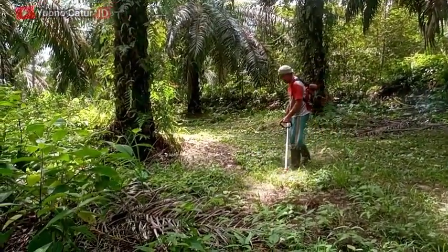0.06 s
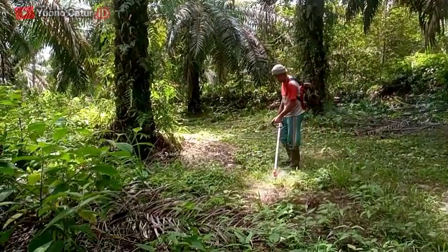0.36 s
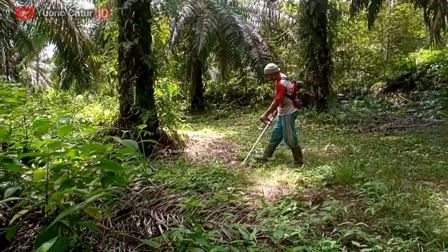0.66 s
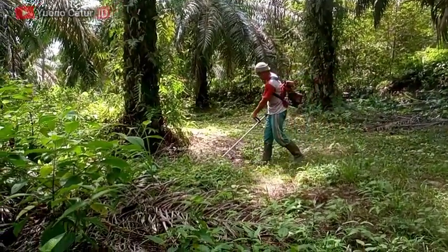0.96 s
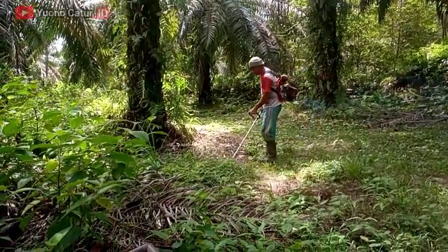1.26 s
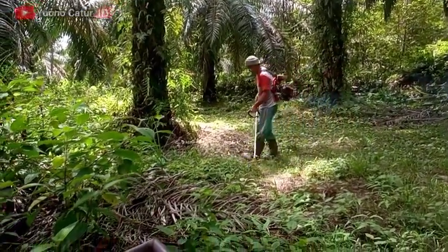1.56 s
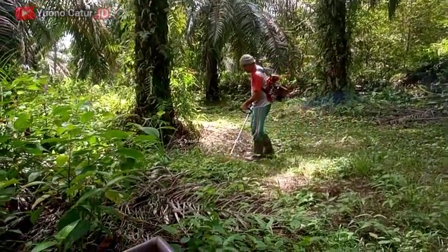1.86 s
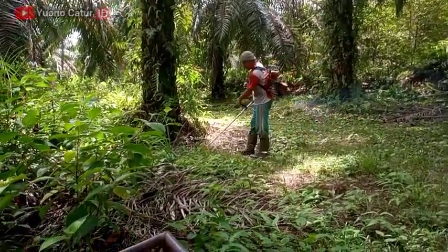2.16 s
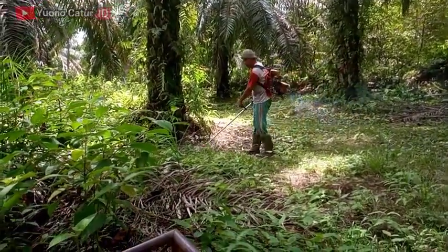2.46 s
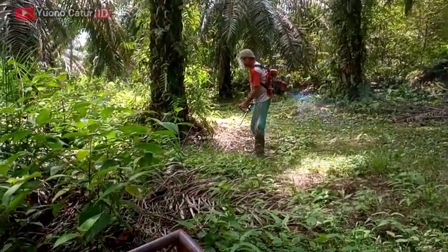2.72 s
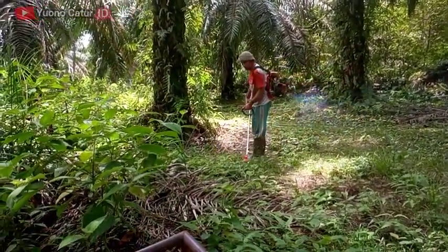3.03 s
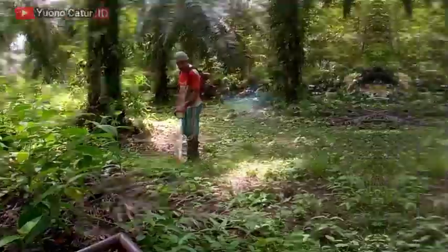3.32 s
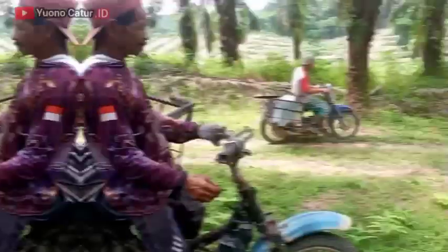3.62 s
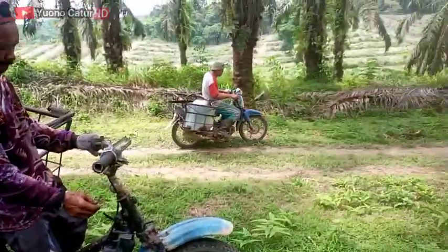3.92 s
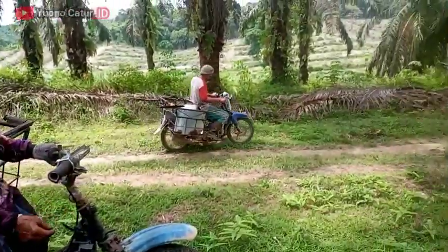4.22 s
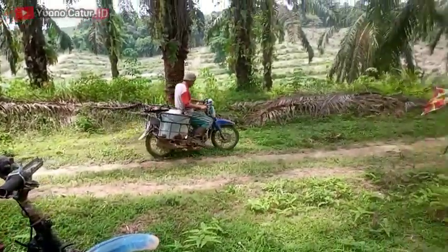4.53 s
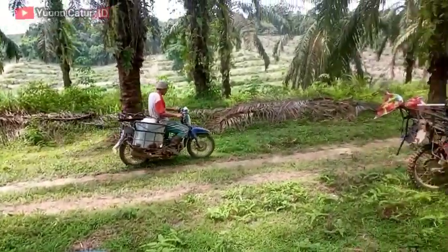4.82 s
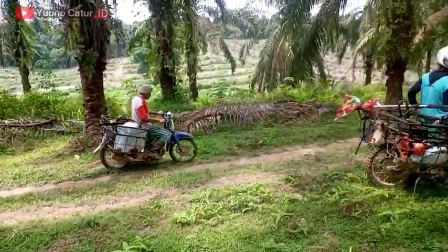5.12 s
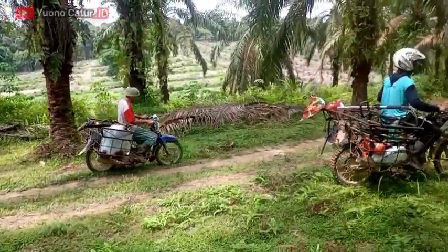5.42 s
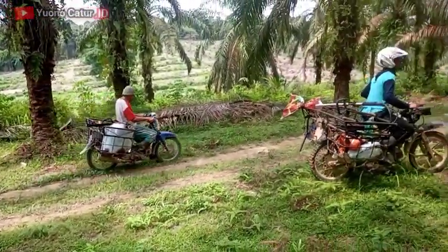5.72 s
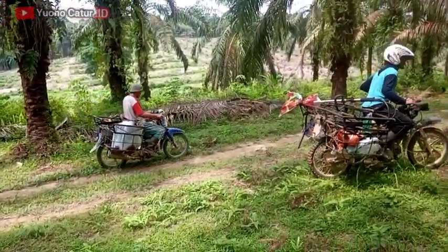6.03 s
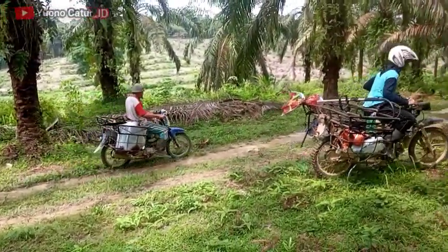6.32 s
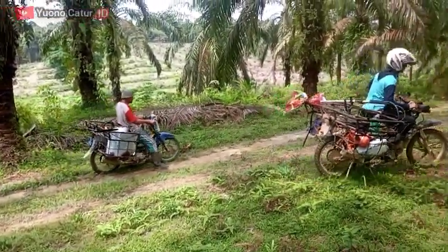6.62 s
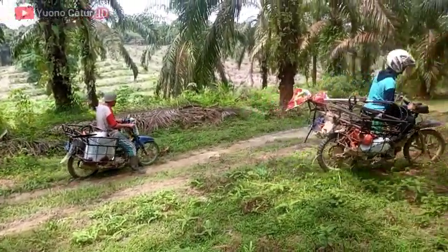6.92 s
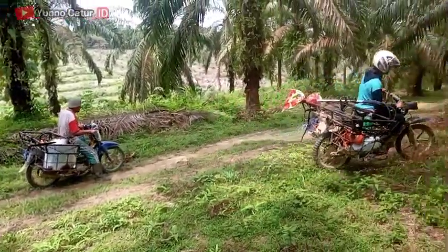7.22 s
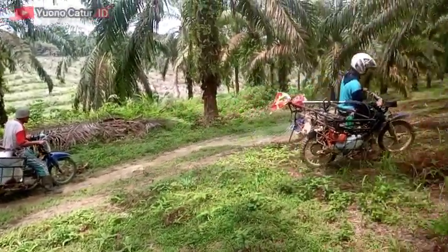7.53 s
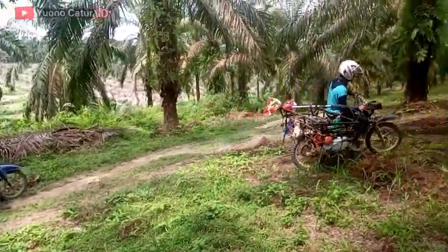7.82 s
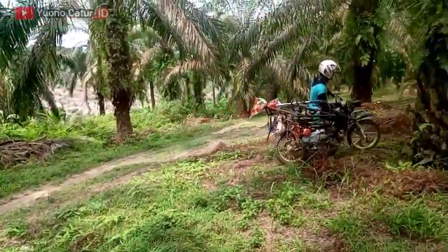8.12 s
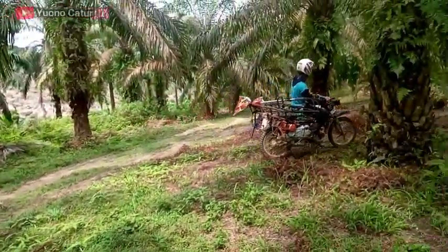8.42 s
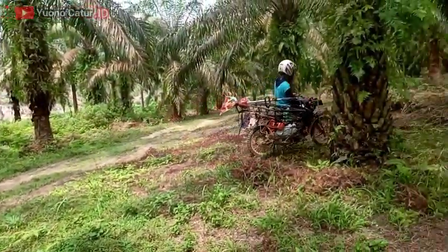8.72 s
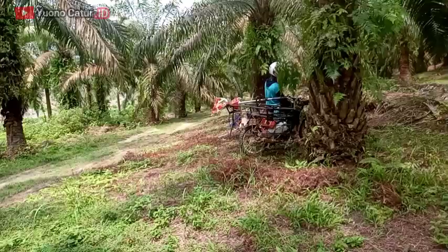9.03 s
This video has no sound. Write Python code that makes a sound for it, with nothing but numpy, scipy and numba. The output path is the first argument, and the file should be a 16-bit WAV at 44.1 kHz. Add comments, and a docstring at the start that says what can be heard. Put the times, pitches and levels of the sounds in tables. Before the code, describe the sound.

A petrol brush cutter drones and hisses in plantation undergrowth over the low burble of a distant motorcycle. The sound fades briefly to silence and gives way to two motorcycles idling near the microphone, the closest with a deep, uneven thump. The other opens its throttle, barking and clattering as it moves off along a track, then slows and starts to recede as the idling thump comes forward again.

```python
"""A two-stroke brush cutter buzzes and hisses through plantation undergrowth, a motorcycle ticking over
further off. Both fade out and a second scene fades in: a four-stroke motorcycle thumps at idle beside
the microphone while the first one, now close, revs, barks and pulls away down the track.
Each engine's firings ring its exhaust; the cutter's blade hisses in the grass and snaps stalks.
The recorder's gain control ducks the whole sound under the loudest thumps."""
import sys
import numpy as np
from scipy import signal
from scipy.fft import rfft, irfft
from scipy.io import wavfile
from scipy.ndimage import uniform_filter1d
from numba import njit

SR = 44100
rng = np.random.default_rng(int(sys.argv[2]) if len(sys.argv) > 2 else 0)


def log_audio(samples):
    """Write samples as a 16-bit WAV file to the path given in sys.argv[1]."""
    # one column per channel
    frames = np.atleast_2d(samples).T
    # limit to full scale, then quantise
    limited = np.clip(frames, -1, 1)
    pcm = np.round(limited * 32767).astype(np.int16)
    wavfile.write(sys.argv[1], SR, pcm)


N = 404397
T = np.arange(N) / SR
CUT_S, FADE_OUT_S, FADE_IN_S = 3.547, 0.48, 0.38  # the two scenes meet in silence at the cut


def undb(db):
    """Decibels to gain."""
    return 10 ** (np.asarray(db) / 20)


def noise():
    """White noise."""
    return rng.standard_normal(N)


def unit(x):
    """Scale to rms 1."""
    return x / np.sqrt(np.mean(x ** 2))


def steady(x):
    """Hold the rms near 1 over about half a second."""
    power = uniform_filter1d(uniform_filter1d(x ** 2, SR // 2), SR // 4)
    return x / np.sqrt(power + 1e-12)


def walk(steps_per_s):
    """Smooth random wander of rms 1."""
    hold = int(SR / steps_per_s)
    steps = np.repeat(rng.standard_normal(N // hold + 1), hold)
    return unit(uniform_filter1d(steps, hold)[:N])


def curve(table, column=1):
    """One column of a timed table at every sample."""
    rows = np.array(table)
    return np.interp(T, rows[:, 0], rows[:, column])


def fade(seconds, power=1):
    """Gain that grows from nothing at the cut: after it for positive seconds, before it for negative."""
    return np.clip((T - CUT_S) / seconds, 0, 1) ** power


def ring(x, modes, order=1):
    """Parallel resonances (frequency [Hz], width [Hz], level [dB]); higher orders have steeper skirts."""
    out = 0
    for hz, width, db in modes:
        b, a = signal.iirpeak(hz, hz / width, SR)
        out = out + undb(db) * signal.sosfilt(np.tile(np.r_[b, a], (order, 1)), x)
    return out


def colour(x, points):
    """Shape a sound by a spectrum (frequency [Hz], level [dB]) that falls away below its first point."""
    hz, db = np.transpose(points)
    f = np.arange(N // 2 + 1) * SR / N + 1
    gain = undb(np.interp(np.log(f), np.log(hz), db))
    low_cut = np.minimum(f / hz[0], 1) ** 2
    return irfft(rfft(x) * gain * low_cut, N)


def firings(speed):
    """Firing times: one for each whole cycle of an engine that follows a speed table."""
    cycles = np.cumsum(curve(speed) * (T >= speed[0][0])) / SR
    return T[1:][np.diff(np.floor(cycles)) > 0]


def strike(times, gains):
    """Impulses at the given times."""
    return np.bincount(np.clip(np.asarray(times) * SR, 0, N - 1).astype(int), gains, N)


def scatter(times, spread_db):
    """Impulses of uneven size."""
    return strike(times, undb(spread_db * rng.standard_normal(len(times))))


def puffs(pulses, rise_s, decay_s):
    """A swelling and dying envelope after each impulse."""
    t = T[:SR // 4]
    shape = (1 - np.exp(-t / rise_s)) ** 2 * np.exp(-t / decay_s)
    return signal.fftconvolve(pulses, shape / shape.max())[:N]


def waiting_bike(burble_db=-39.5, tick_db=-37):
    """Behind the cutter, a motorcycle's exhaust is a low burble, with a tick on every firing."""
    # engine ticking over: (time [s], firing rate [Hz])
    speed = [(0, 27.79), (.3, 26.37), (.59, 24.67), (.9, 25.76), (1.7, 26.08), (2.09, 26.78), (3.52, 25.58)]
    # exhaust from afar, and the ring of the ticks: (frequency [Hz], width [Hz], relative level [dB])
    pipe_modes = [(81.7, 13.4, -0.5), (141.3, 73, -3), (188, 96, -4.5), (258, 290, -18.5), (460, 40, -8.5)]
    tick_modes = [(2927, 154, 14.5), (4594, 770, 16), (6360, 1100, 8), (9500, 2100, 8)]
    pulses = scatter(firings(speed), spread_db=1.0)
    burble = steady(ring(unit(pulses) + 1.4 * noise(), pipe_modes, order=2))
    ticks = steady(ring(puffs(pulses, rise_s=0.0014, decay_s=0.0015) * noise(), tick_modes, order=2))
    return (burble * undb(burble_db) * fade(-0.67, power=1.3)
            + ticks * undb(tick_db) * fade(-FADE_OUT_S, power=1.3))


def brush_cutter(hiss_db=-27, swell_db=1.12):
    """In the undergrowth, firings ring the silencer; the blade hisses once a turn and snaps stalks."""
    # engine, loaded and swung about: (time [s], firing rate [Hz], exhaust level [dB])
    engine = [(0.0, 87.1, -32), (0.07, 86.4, -32.5), (0.2, 88.44, -35.5), (0.34, 86.2, -33.5),
              (0.61, 87.8, -34.5), (0.8, 87.1, -38.5), (1.93, 88.2, -36), (2.18, 88.73, -39.5),
              (2.52, 89.5, -33.5), (2.99, 89.6, -38.5), (3.04, 88.0, -41.5), (3.25, 88.2, -45)]
    # silencer resonances: (frequency [Hz], width [Hz], relative level [dB])
    silencer_modes = [(89, 39, -10.5), (390, 160, -20.5), (533.5, 42, -11.5), (623, 21, -2.5),
                      (818, 136, 6), (876, 38, -17.5), (1195, 73, -5), (1376, 250, -7)]
    # hiss as heard, with the microphone's bright peak near 15 kHz: (frequency [Hz], relative level [dB])
    hiss_spectrum = [(300, -24), (600, -10), (1050, -9.5), (1350, -6.5), (1900, -10.5), (2900, -6.5),
                     (4500, -5.5), (5600, -9.5), (6600, 1), (7400, 3), (8400, -5.5), (10000, -10),
                     (13500, -17.5), (15000, -7.5)]
    # brief ringing swells in the buzz and hiss:
    # (time [s], half-length [s], frequency [Hz], width [Hz], level [dB])
    swells = [(0.085, 0.062, 815, 220, -34), (2.544, 0.068, 1243, 50, -35.5),
              (3.166, 0.066, 6620, 500, -27), (3.327, 0.093, 6870, 910, -36.5)]
    turns = np.cumsum(curve(engine) * (1 + 0.0016 * walk(39.72))) / SR
    pulses = scatter(T[1:][np.diff(np.floor(turns)) > 0], spread_db=2.5)
    gas = unit(puffs(pulses, rise_s=0.00097, decay_s=0.019) * noise())
    exhaust = unit(ring(unit(pulses) + 0.36 * gas, silencer_modes, order=2))
    # the geared blade head turns at its own pace
    sweep = 1 + 0.12 * np.cos(2 * np.pi * 1.2 * turns) + 0.14 * walk(150)
    snaps = scatter(rng.uniform(0, T[-1], N // 400), spread_db=3)
    crackle = 0.35 * unit(puffs(snaps, rise_s=0.0001, decay_s=0.0008) * noise())
    hiss = unit(colour(unit(sweep * noise()) + 0.057 * gas + crackle, hiss_spectrum))
    hiss *= undb(hiss_db + swell_db * walk(10))  # it swells in thicker grass
    ringing = 0
    for at_s, half_s, hz, width, db in swells:
        envelope = np.exp(-((T - at_s) / half_s) ** 2)
        ringing += undb(db) * envelope * unit(ring(gas, [(hz, width, 0)], order=2))
    machine = exhaust * undb(curve(engine, column=2)) + hiss
    return machine * fade(-FADE_OUT_S, power=1.3) + ringing


def riding_bike(thud_db=-30.5, pop_db=-44, chuff_db=-41.5, bark_db=-31, honk_db=-50.5, clatter_db=-40):
    """Close by, then leaving: each firing thuds and chuffs, barking under throttle, with clatter between."""
    # idling, pulling away and easing off: (time [s], firing rate [Hz])
    speed = [(3.52, 28.81), (3.86, 15.76), (4.89, 15.24), (5.7, 15.66), (5.96, 22.48), (6.24, 24.77),
             (7.5, 27.51), (7.73, 23.29), (8, 26.09), (8.21, 21.3), (8.53, 19.98), (8.74, 15.93),
             (9.17, 14.98)]
    # throttle: (time [s], opening [0-1])
    throttle_moves = [(3.55, .8), (3.78, 0.05), (5.66, 0.09), (5.85, 0.89), (6.7, 0.77), (7.5, 1),
                      (7.73, 0.54), (7.93, 0.95), (8.09, 0.32), (9, 0.02)]
    # exhaust pipe resonances: (frequency [Hz], width [Hz], relative level [dB])
    thud_modes = [(101, 41, -8.5), (195.5, 175, 0), (370, 310, -12)]
    pop_modes = [(273.7, 134, 0)]
    chuff_modes = [(990, 260, 1), (1460, 270, 10.5), (1706, 260, 10), (2080, 200, 5)]
    # bark as heard, with the microphone's bright peak: (frequency [Hz], width [Hz], relative level [dB])
    bark_peaks = [(1630, 110, -3), (2500, 960, 10), (3697, 163, 21.5), (4870, 1070, 16.5), (6130, 560, 16),
                  (6770, 530, 16.5), (9860, 1700, 1.5), (15800, 2300, 13.5)]
    # clatter as heard, with the microphone's peak near 15 kHz: (frequency [Hz], relative level [dB])
    clatter_spectrum = [(700, -15.5), (950, 2), (1500, -20.5), (2300, 3.5), (3000, 0), (4100, 2),
                        (5600, -2), (6300, 1.5), (6650, 7), (7400, 7.5), (8400, -4.5), (11000, -11.5),
                        (13500, -23), (15000, -7.5)]
    # echoes off the palm trunks: (delay [s], level [dB])
    trunk_echoes = [(.0095, -27), (0.0212, -12.5)]
    times, throttle = firings(speed), curve(throttle_moves)
    blows = scatter(times - 0.0012, spread_db=1.0)
    # the gas leaves as a rounded push, which holds no treble
    push_shape = np.exp(-((T[:SR // 100] - 0.0015) / 0.00095) ** 2)
    push = signal.fftconvolve(blows, push_shape)[:N]
    push = push + sum(undb(db) * np.roll(push, int(delay * SR)) for delay, db in trunk_echoes)
    thud = steady(ring(push, thud_modes, order=2))
    unburnt_gas = puffs(blows, rise_s=0.0015, decay_s=0.0071) * noise()
    spit = steady(ring(unburnt_gas, [(1160, 560, -2), (3180, 1900, -6.5)], order=2))
    pop = steady(ring(push, pop_modes, order=3)) + undb(-10) * spit
    honk = steady(ring(push, [(387, 220, 0)], order=2))  # a higher pipe resonance
    chuff = steady(ring(puffs(blows, rise_s=0.00023, decay_s=0.036) * noise(), chuff_modes))
    crack = puffs(scatter(times, spread_db=3.4), rise_s=0.00047, decay_s=0.0042)
    bark = steady(ring(crack * noise(), bark_peaks))
    valves = unit(puffs(strike(times + 0.016, np.ones(len(times))), rise_s=0.00047, decay_s=0.0044))
    clatter = steady(colour((1 + 0.35 * valves) * noise(), clatter_spectrum))
    turned = np.clip((T - 6.13) / 0.36, 0, 1)  # the chuff drops as the bike turns down the track
    overrun = np.exp(-((T - 8.3) / 0.25) ** 2)  # coasting as the throttle shuts, it pops hollowly
    away_s = np.maximum(T - 8.32, 0)  # the thud recedes among the trees
    octaves_above_idle = np.log2(curve(speed) / 17.2)
    return fade(FADE_IN_S) * (
        thud * undb(thud_db + 4 * overrun - 7.5 * away_s)
        + pop * undb(pop_db + 9.5 * overrun)
        + chuff * undb(chuff_db - 6.5 * turned)
        + (bark * undb(bark_db) + honk * undb(honk_db)) * throttle
        + clatter * undb(clatter_db + 5.5 * octaves_above_idle))


def idling_bike(boom_gain_db=3, gas_gain_db=-42, fins_db=-50):
    """Beside the microphone, a four-stroke's exhaust booms with a puff of gas; its fins sing, wavering."""
    # hunting idle: (time [s], firing rate [Hz])
    speed = [(3.55, 10.77), (4.87, 11.34), (5.12, 9.15), (5.6, 10.52), (6.59, 8.86), (6.86, 11.91),
             (7.19, 8.8), (7.49, 11.83), (7.72, 9.61), (8.32, 9.52), (8.82, 11.12), (9.17, 7.83)]
    # strength of the power strokes: (time [s], relative level [dB])
    strength = [(3.6, -2), (4.4, 0), (5.6, 0), (5.79, -4.5), (5.9, -11.5), (6.82, -14), (6.93, -7),
                (7.49, -16), (7.6, -3), (7.8, -8.5), (7.93, -16), (8.02, -29), (8.11, -5.5), (8.8, -.5),
                (9.05, -1)]
    # exhaust pipe: (frequency [Hz], time to fall 60 dB [s], relative level [dB])
    pipe_modes = [(108.5, 0.071, -6), (127.9, 0.048, 5), (142.9, 0.23, -13.5), (163.3, 0.11, -20),
                  (250.4, 0.23, -26)]
    # cooling fins: (frequency [Hz], width [Hz], relative level [dB])
    fin_modes = [(3176, 65, 20), (4100, 53, 14), (6470, 270, 8.5)]
    times = firings(speed)
    gains = undb(np.interp(times, *np.transpose(strength)))
    detunes = 1 + 0.037 * rng.standard_normal((len(times), len(pipe_modes)))
    t = T[:SR // 4]
    valve_lift = 1 - np.exp(-(t / 0.009) ** 2)
    boom = np.zeros(N + len(t))
    for start_s, gain, detune in zip(times, gains, detunes):
        stroke = 0
        for k, (hz, t60, db) in enumerate(pipe_modes):
            # neighbouring modes swing against each other, so the boom swells before it dies
            sign = (-1) ** (k + 1)
            stroke += sign * undb(db) * np.sin(2 * np.pi * hz * detune[k] * t) / 1000 ** (t / t60)
        i = int(start_s * SR)
        boom[i:i + len(t)] += gain * valve_lift * stroke
    rush = unit(ring(noise(), [(650, 540, 0)], order=2))
    gas = puffs(strike(times, gains), rise_s=0.0043, decay_s=0.03) * rush
    fins = unit(ring(noise(), fin_modes, order=2)) * undb(2.6 * walk(8.3))
    machine = boom[:N] * undb(boom_gain_db) + gas * undb(gas_gain_db) + fins * undb(fins_db)
    return machine * fade(FADE_IN_S, power=1.4)


def scene():
    """The cutter and both motorcycles, through one microphone that rolls off below 75 Hz."""
    air = brush_cutter() + waiting_bike() + riding_bike() + idling_bike()
    return colour(air, [(75, 0), (SR / 2, 0)])[None]


@njit
def follow(x, attack, release):
    """Envelope that rises at the attack rate and falls at the release rate."""
    out, level = np.empty(len(x)), 0.
    for i in range(len(x)):
        level += (x[i] - level) * (attack if x[i] > level else release)
        out[i] = level
    return out


def record(dry, threshold_db=-15.5, attack_s=0.0021, release_s=0.056, top_hz=15600):
    """The recorder's gain control holds the loudest thumps down; a steep filter cuts the top."""
    envelope = follow(np.abs(dry[0]), 1 / (attack_s * SR), 1 / (release_s * SR))
    held = dry / np.maximum(envelope / undb(threshold_db), 1)
    return signal.sosfilt(signal.ellip(10, 0.2, 70, top_hz, fs=SR, output="sos"), held)


dry = scene()
out = record(dry)
log_audio(out)
```